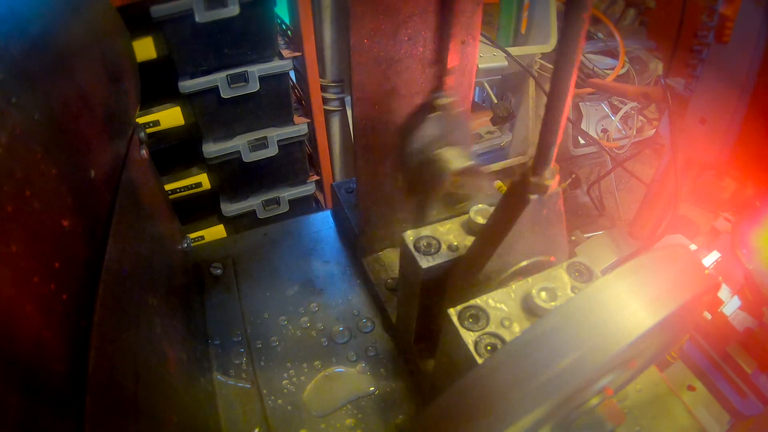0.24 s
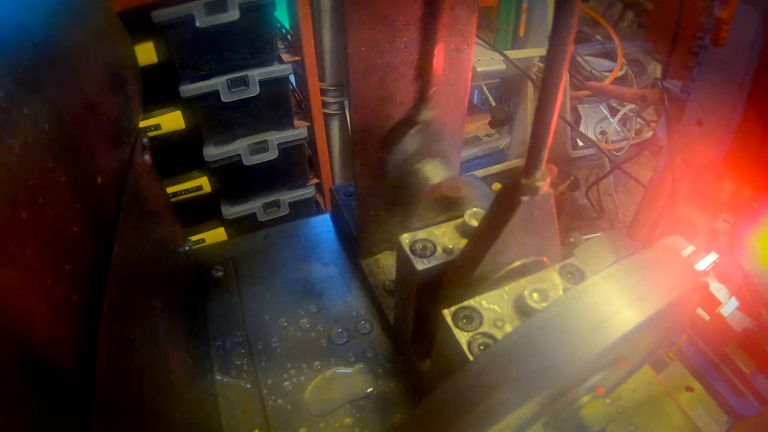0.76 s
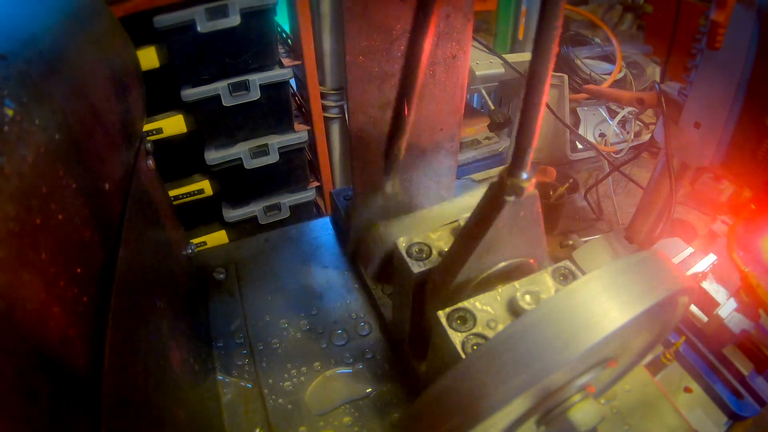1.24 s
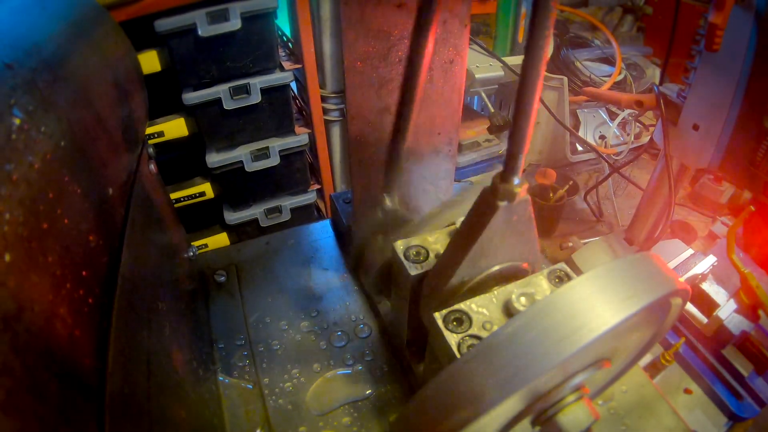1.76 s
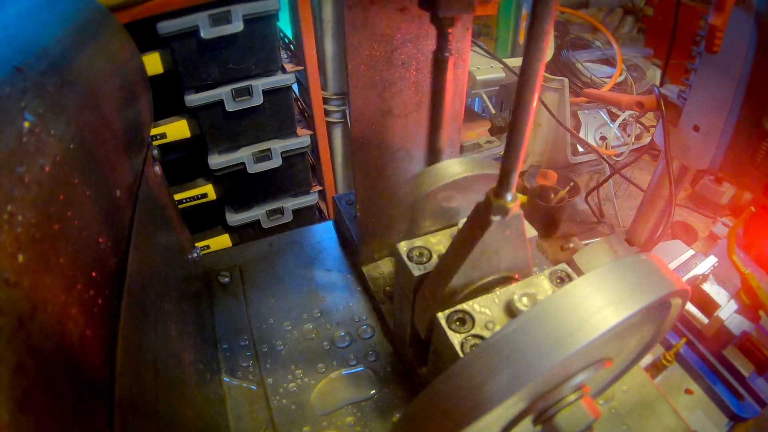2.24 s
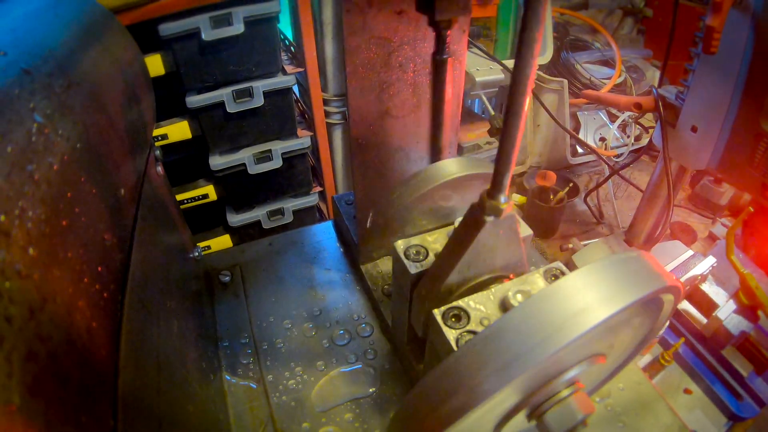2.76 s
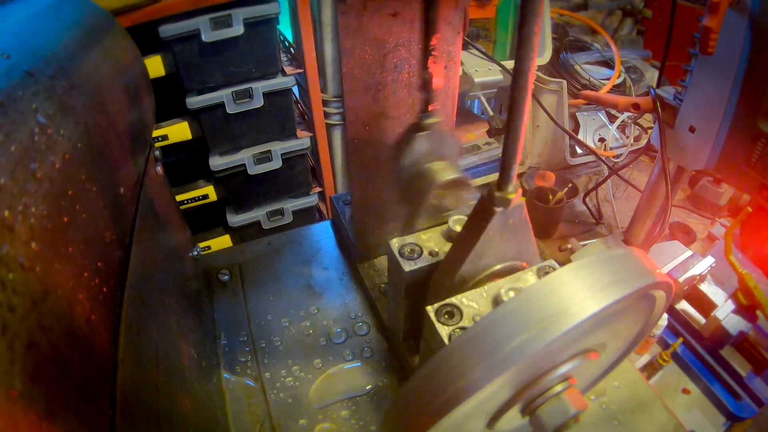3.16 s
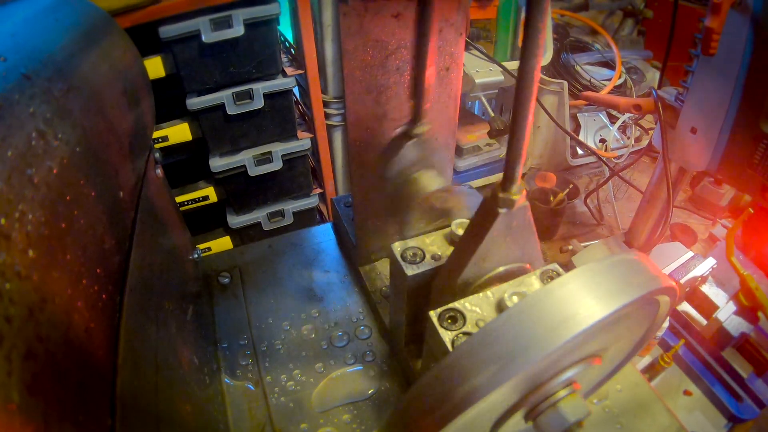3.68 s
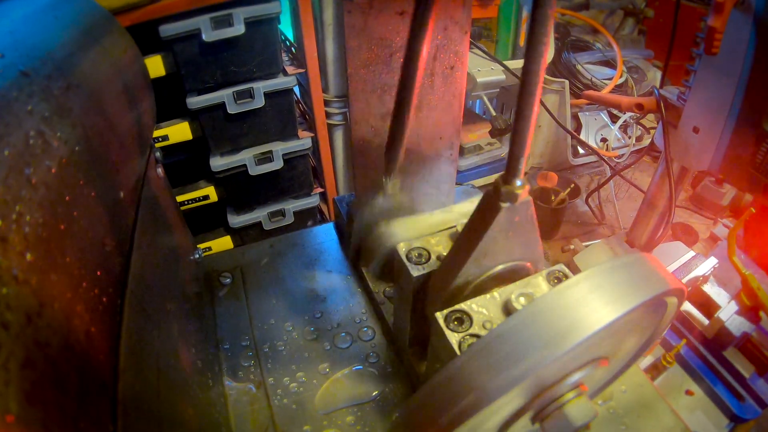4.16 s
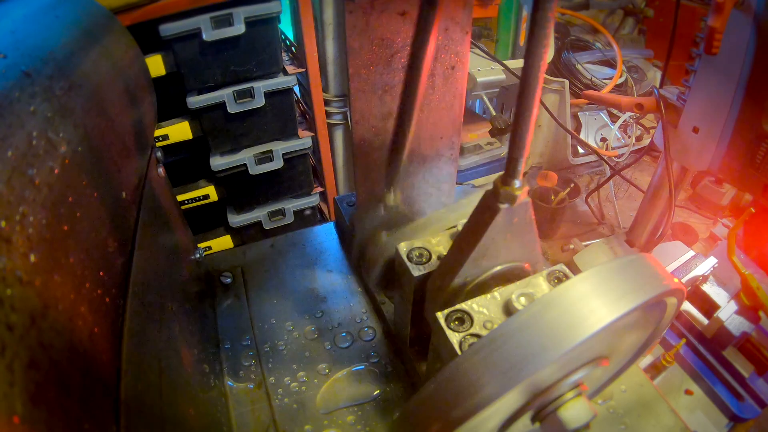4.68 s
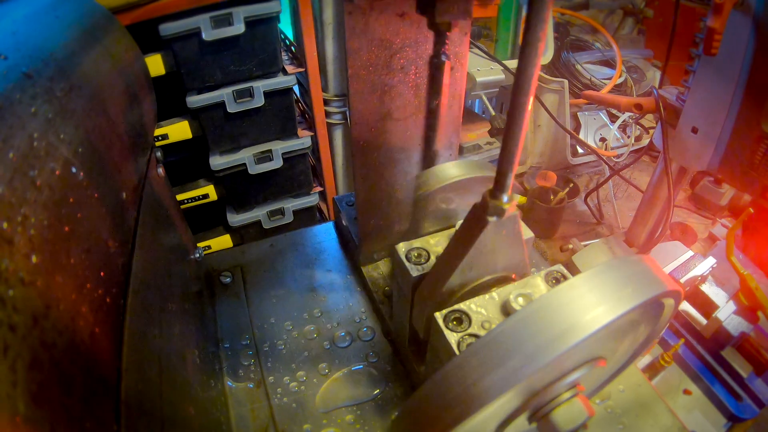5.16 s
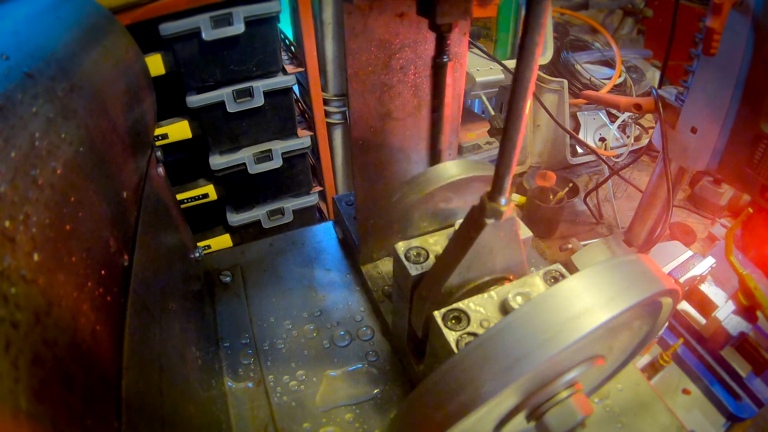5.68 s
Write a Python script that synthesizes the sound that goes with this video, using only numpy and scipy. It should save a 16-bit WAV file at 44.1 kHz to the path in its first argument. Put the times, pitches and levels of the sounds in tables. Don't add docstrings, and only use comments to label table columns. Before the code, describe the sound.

A small steam engine is already running at the start and keeps going for all six seconds, almost four turns a second, close to a stereo microphone in a dry workshop. Every turn brings a quick cluster of metallic ticks, short rattles and small rings, mostly slightly left, with hard, dry knocks at both ends of the stroke. Their strength varies; sharper clacks stand out near 1.3, 4.25, 5.0 and 5.6 s. Bright steam hisses constantly, swelling in rapid chuffs twice a turn, with thin breathy whistles in the pipe. Underneath, a burner roars softly while firebox and flue sing low wavering notes, surging irregularly; the higher one jumps up weakly around 3.1 s and wavers again near 5 s. A quiet, steady pump hum runs from about 2.1 to 5.0 s. Low draughts brush the microphone, and one soft thump of air pushes the right side at 4.9 s.

```python
import sys
import numpy as np
from scipy import signal
from scipy.io import wavfile
from scipy.ndimage import uniform_filter1d

SR = 44100
rng = np.random.default_rng(int(sys.argv[2]) if len(sys.argv) > 2 else 0)


def decibels_to_gain(level_db):
    exponent = np.asarray(level_db, float) / 20
    return 10 ** exponent


def store_pcm(level_fs):
    pcm = np.round(np.clip(level_fs, -1, 1) * 32767).astype(np.int16)
    wavfile.write(sys.argv[1], SR, np.atleast_2d(pcm).T)


N = 261072


def add(mix, s, sound):
    if s >= 0:
        part = mix[:, round(s * SR):][:, :sound.shape[1]]
        part += sound[:, :part.shape[1]]


def panned(x, lr_db):
    return x * decibels_to_gain([[lr_db / 2], [-lr_db / 2]])


def tone(hz, strength):
    return np.sqrt(2) * strength * np.sin(2 * np.pi * np.cumsum(hz) / SR)


def columns(table, hz):
    f, *rest = np.transpose(table)
    return [np.interp(np.log(hz + 1), np.log(f + 1), c)[:, None] for c in rest]


def white_pair(size):
    noise = rng.standard_normal((2, N + size)) * np.sqrt(SR / 2)
    return signal.stft(noise, SR, nperseg=size, noverlap=size * 3 // 4)


def ports(z, left, right, same, lead, size):
    same = np.clip(same, -1, 1)
    shared = same * z[0] * np.exp(-1j * lead)
    own = np.sqrt(1 - same ** 2) * z[1]
    pair = np.array([left * z[0], right * (shared + own)])
    return signal.istft(pair, SR, nperseg=size, noverlap=size * 3 // 4)[1][:, :N]


def resonances(table, hz, sign):
    return sum(decibels_to_gain(2 * db + sign * lr_db) / (1 + (2 * (hz[:, None] - f) / width) ** 2) ** 2
               for f, width, db, lr_db in table)


def wander(t, top_per_s):
    rates = np.geomspace(.15, 1, 24) * top_per_s
    x = sum(np.sin(2 * np.pi * (f * t + p)) for f, p in zip(rates, rng.random(24)))
    return x / np.sqrt(12)


def ring(hz, t60, rise):
    t = np.arange(round(t60 * SR)) / SR
    return decibels_to_gain(-60 * t / t60) * np.minimum(t / rise, 1) * np.sin(2 * np.pi * hz * t)


def burst(hz, length):
    u = np.arange(round(length * SR)) / (length * SR)
    return 9.5 * u * (1 - u) ** 2 * np.exp(-u) * np.sin(2 * np.pi * hz * length * u)


CRANK_PASSES = np.interp(np.arange(24), *np.transpose([(0, -.0027), (1, .2639), (5, 1.3259), (7, 1.8555),
                (10, 2.6475), (14, 3.7102), (23, 6.0952)]))


def crank_turns(t):
    return np.interp(t, CRANK_PASSES, np.arange(len(CRANK_PASSES)))


def bench(x):
    taps = np.zeros((2, 4000))
    at = np.arange(60, 3980, 20) + rng.integers(0, 20, (2, 196))
    fade = decibels_to_gain(-60 * at / SR / .08)
    np.put_along_axis(taps, at, rng.choice([-1., 1.], at.shape) * fade, 1)
    return signal.fftconvolve(x, taps / np.linalg.norm(taps[0]), axes=1)[:, :N]


def puff():
    at_s, hz, db = 4.873, 55, -28
    u = (np.arange(N) / SR - at_s) * hz * np.pi
    return np.array([[0], [1]]) * decibels_to_gain(db) * (1 - 2 * u ** 2) * np.exp(-u ** 2)


def pump():
    on_s, off_s, hz, db = 2.08, 5.01, 100.0, -37
    t = np.arange(N) / SR
    gate = np.clip(np.minimum(t - on_s, off_s - t) / .03, 0, 1)
    return panned(np.sqrt(2) * decibels_to_gain(db) * gate * np.sin(2 * np.pi * hz * t), .1)


# (frequency [Hz], level [dB per Hz], left-right likeness [0-1])
BURNER_ROAR = [(20, -75, 0.59), (32, -60, 0.68), (64.6, -70.5, 0.58), (97, -65, 0.76), (151, -55.5, 0.99),
               (169, -57.5, 0.88), (217, -65.5, 0.93), (242.7, -59, 1), (297, -73.5, 0.85), (476, -75.5, 1),
               (620, -66.5, 0.72), (650, -74.5, 1), (1124, -75.5, 0.21), (1790, -110, 1)]
# (frequency [Hz], width [Hz], level [dB per Hz], left over right [dB])
HOLLOW_TONES = [(122, 19, -52, 1.5), (231, 28, -64.5, 5), (351, 43, -70, -1.5), (533.4, 60, -61, 2.5),
                (770, 97, -70, 0.5), (838, 29, -71.5, 0), (1017, 41, -70.5, 11)]
# (time [s], level [dB])
DRAUGHT_LEVELS = [(0.0, -48), (1.57, -55), (2.09, -48), (2.13, -59), (2.34, -49), (3.94, -55), (4.15, -42),
                  (4.39, -57), (4.75, -46), (4.83, -60), (4.88, -39), (4.93, -58), (5.01, -44), (5.64, -52),
                  (5.89, -45), (5.92, -58)]


def burner():
    hz, t, z = white_pair(size=4096)
    level_db, same = columns(BURNER_ROAR, hz)
    s, draught_db = np.transpose(DRAUGHT_LEVELS)
    breath_per_s = 3.0
    breaths = [(0, 58, np.interp(t, s, draught_db) - draught_db.mean()),
               (470, 650, 1.6 * wander(t, breath_per_s)),
               (138, 300, 0.97 * wander(t, breath_per_s))]
    swell_db = sum(((hz > low) & (hz < high))[:, None] * db for low, high, db in breaths)
    powers = [decibels_to_gain(2 * level_db) + resonances(HOLLOW_TONES, hz, sign) for sign in (1, -1)]
    left, right = np.sqrt(powers) * decibels_to_gain(swell_db)
    return ports(z, left, right, same, 0, size=4096)


# (time [s], peak level [dB], half length [s])
FLAME_SURGES = [(0.054, -33, 0.1), (0.35, -32.5, .06), (0.507, -33, 0.088), (0.664, -29, 0.043),
                (0.796, -34, 0.017), (0.951, -29.5, 0.11), (1.246, -38, 0.046), (1.398, -33.5, 0.075),
                (1.658, -37, 0.11), (1.854, -32, 0.043), (1.99, -37.5, 0.067), (2.2, -39, 0.046),
                (2.407, -32, 0.054), (2.69, -39, 0.042), (2.903, -34.5, 0.061), (3.255, -38, 0.078),
                (3.393, -32, 0.047), (3.564, -41, 0.031), (3.749, -28, 0.075), (4.097, -30, 0.11),
                (4.245, -29, .04), (4.434, -31.5, 0.063), (4.718, -28.5, 0.098), (5.023, -36, .04),
                (5.14, -32.5, .05), (5.28, -36, 0.027), (5.46, -34, 0.047), (5.65, -34.5, 0.038),
                (5.797, -31.5, .05), (5.9, -33, 0.03)]


def firebox():
    note_hz, wander_hz, rest_db = 120.5, 2.78, -43
    t, slow = np.arange(N) / SR, np.arange(0, N + 256, 256) / SR
    swell = decibels_to_gain(rest_db)
    for s, db, half in FLAME_SURGES:
        swell = swell + decibels_to_gain(db) * np.exp(-((slow - s) / half) ** 2)
    hz = note_hz + wander_hz * wander(slow, 4.5)
    return panned(tone(np.interp(t, slow, hz), np.interp(t, slow, swell)), 0.22)


# (time [s], pitch [Hz], level [dB])
FLUE_PITCHES = [
    (0.0, 221.4, -39),
    (0.1, 229, -40.5),
    (1.35, 221.5, -40.5),
    (3.03, 221.1, -43),
    (3.08, 228.9, -46.5),
    (4.66, 220.5, -41),
    (4.95, 231.0, -40.5),
    (5.13, 219.5, -43),
    (5.92, 224.5, -39),
]


def flue():
    flutter_per_s, depth_db, wander_hz = 7.0, 3.3, 1.4
    s, hz, level_db = np.transpose(FLUE_PITCHES)
    t, slow = np.arange(N) / SR, np.arange(0, N + 256, 256) / SR
    flutter = np.interp(t, slow, wander(slow, flutter_per_s))
    drift = np.interp(t, slow, wander(slow, flutter_per_s))
    swell = decibels_to_gain(np.interp(t, s, level_db) + depth_db * flutter - 5.0)
    swell = uniform_filter1d(swell, 900)
    return panned(tone(np.interp(t, s, hz) + wander_hz * drift, swell), 0.18)


# (frequency [Hz], width [Hz], level [dB per Hz], left over right [dB])
PIPE_WHISTLES = [
    (2840, 140, -67.5, -2),
    (3700, 125, -71.5, 7),
    (4500, 230, -73.5, -7),
    (6240, 55, -88, -.6),
]


def pipe(shut_db=-8):
    hz, _, z = white_pair(size=2048)
    angle = crank_turns(np.arange(N) / SR) % 1
    shut = np.exp(-((angle - .3) / .09) ** 2) + .6 * np.exp(-((angle - .8) / .06) ** 2)
    left, right = np.sqrt([resonances(PIPE_WHISTLES, hz, sign) for sign in (1, -1)])
    return decibels_to_gain(shut_db * shut) * ports(z, left, right, 0.89, 0, size=2048)


# (frequency [Hz], left [dB per Hz], right [dB per Hz], likeness [0-1], left leads by [rad])
STEAM_HISS = [(940, -99, -80, 0.51, .3), (1410, -69.5, -73, 0.73, 0.11), (1760, -73, -75.5, 0.5, 0.28),
              (2160, -70.5, -72, 0.79, .1), (2600, -68, -72.5, 0.88, .1), (3880, -69.5, -71, 0.99, 0.11),
              (4030, -73, -76, 1, .1), (5270, -72, -72.5, 0.77, 0.62), (5860, -70, -71.5, 0.61, 0.33),
              (6050, -73, -70.5, .3, .8), (6230, -73.5, -69.5, 0.84, 0.75), (7080, -69, -71.5, 1, 2.02),
              (7730, -70.5, -70, 0.47, 1.32)]
# (frequency [Hz], left [dB per Hz], right [dB per Hz], likeness [0-1], left leads by [rad])
STEAM_FIZZ = [(8370, -69.5, -79, .6, 0.7), (9080, -75.5, -71, 0.72, 2.84), (9940, -68, -97, 0.81, 1.7),
              (10310, -72, -105, .5, 2.1), (10900, -84, -87, .25, 1.6), (12000, -83.5, -100, .15, 1.6),
              (13700, -82.5, -99, .1, 1.9), (15100, -101, -116, .1, 1.9)]
# (crank angle [turns], half length [turns], frequency [Hz], half width [Hz], left [dB], right [dB])
STEAM_SWELLS = [(0.32, 0.1, 9430, 3100, 5, 5), (0.886, 0.053, 9100, 2300, 2, 3),
                (0.37, 0.075, 17400, 1200, 5, 6), (0.817, 0.045, 10000, 3400, 5.5, 6),
                (0.27, 0.19, 15000, 700, 14, -10), (.85, 0.12, 15000, 700, 17, -3),
                (0.16, 0.25, 2530, 240, 3, -2.5), (0.383, 0.02, 3300, 2900, 2.5, 0),
                (0.044, 0.17, 6700, 4100, 2, 2), (0.056, 0.093, 11640, 2300, 4.5, -11),
                (0.51, 0.12, 11700, 1600, 3.5, -8), (0.31, 0.032, 4400, 5700, -3.5, -2.1),
                (0.74, 0.084, 3600, 2800, -0.9, -2.1), (0.51, 0.16, 6100, 600, -3.1, -3.2)]


def steam(patchy_db=1.34, flicker_db=1.1):
    hz, t, z = white_pair(size=256)
    left_db, right_db, same, lead = columns(STEAM_HISS + STEAM_FIZZ, hz)
    crank = crank_turns(t)
    patches = uniform_filter1d(rng.standard_normal(z[0].shape), 5, 0)
    patches = uniform_filter1d(patches, 24, 1)
    flicker = uniform_filter1d(rng.standard_normal(len(t)), 4)
    chance_db = patchy_db * patches / patches.std() + flicker_db * flicker / flicker.std() - 2.0
    strength = 1 + .2 * rng.standard_normal((len(STEAM_SWELLS), len(CRANK_PASSES) + 1))
    for (angle, span, f, width, gain_left_db, gain_right_db), each in zip(STEAM_SWELLS, strength):
        nearest = np.round(crank - angle)
        stroke = each[nearest.astype(int) + 1] * np.exp(-((crank - angle - nearest) / span) ** 2)
        swell = stroke * np.exp(-((hz[:, None] - f) / width) ** 2)
        left_db = left_db + gain_left_db * swell
        right_db = right_db + gain_right_db * swell
    cut = hz[:, None] > 700
    return ports(z, cut * decibels_to_gain(left_db + chance_db), cut * decibels_to_gain(right_db + chance_db), same, lead, size=256)


# (crank angle [turns], rattle length [s], level [dB], left over right [dB])
ROD_CONTACTS = [(0.024, .006, -43.5, 11), (0.389, .001, -51, 0), (.455, .008, -41, 9),
                (.512, .0009, -40, 9), (.533, .0035, -37, 7), (.568, .009, -34.5, 7.5), (.63, .002, -42, 1),
                (0.895, 0.00201, -42.5, 13), (.98, .014, -45, 7), (0.924, 0.0062, -48.5, 10)]
PIN_CONTACTS = [
    (.03, 0.0062, -48, -1),
    (.092, 0.0022, -36.5, .9),
    (0.111, .0024, -44, -1),
    (.633, .0017, -50, 9),
    (.652, .017, -41, 15),
    (.928, 0.0065, -44, .4),
]
VALVE_CONTACTS = [
    (.668, .013, -34.5, -7),
    (.755, .004, -34.5, 4),
    (.892, .0042, -38.5, 4),
]
STRAP_CONTACTS = [
    (.03, .003, -58, 1.2),
    (.672, .0053, -35.5, 6.3),
]
BED_CONTACTS = [
    (.66, .012, -52, -27),
    (.705, .017, -43, 13),
    (.9, .025, -41, 1),
]
COLUMN_CONTACTS = [
    (.657, .006, -45.5, 1.3),
    (.925, 0.00724, -42, 3),
]
# (crank angle [turns], ring [Hz], time to fall 60 dB [s], level [dB], left over right [dB])
LONE_CONTACTS = [
    (.386, 1250, 0.0041, -39, -.4),
    (0.42, 1660, 0.003, -49, -5),
    (.667, 2060, 0.0348, -36, 5.5),
    (.665, 2880, 0.028, -37, 10),
    (.925, 2100, 0.098, -38, 1),
]


def linkage():
    scatter_db, slack_turns, detune = 1.3, .002, .015
    parts = [(3050, 0.0031, ROD_CONTACTS), (5690, 0.0083, PIN_CONTACTS),
             (6290, 0.014, VALVE_CONTACTS), (3540, 0.0035, STRAP_CONTACTS),
             (980, 0.14, BED_CONTACTS), (1451, 0.074, COLUMN_CONTACTS)]
    contacts = [(angle, length, hz, t60, db, lr_db)
                for hz, t60, taps in parts for angle, length, db, lr_db in taps]
    contacts += [(angle, .0017 + .12 * t60, hz, t60, db, lr_db)
                 for angle, hz, t60, db, lr_db in LONE_CONTACTS]
    out = np.zeros((2, N))
    for angle, length, hz, t60, db, lr_db in contacts:
        chances = rng.standard_normal((len(CRANK_PASSES), 3))
        for start, end, (size, late, tune) in zip(CRANK_PASSES, CRANK_PASSES[1:], chances):
            force = rng.choice([-1, 1], 24) * rng.exponential(1, 24)
            place = rng.random(24)
            rattle = np.zeros(1200)
            np.add.at(rattle, np.clip(place * length * SR, 0, 1199).astype(int), force)
            sound = np.convolve(rattle, ring(hz * (1 + detune * tune), t60, 0.00031))
            sound /= np.sqrt(np.sum(sound ** 2) / (.006 * SR))
            sound *= decibels_to_gain(db + scatter_db * size)
            add(out, start + (angle + slack_turns * late) * (end - start), panned(sound, lr_db))
    return out


# (time [s], peak level [dB])
DULL_KNOCKS = [(0.1216, -25), (0.127, -20.5), (0.3992, -18.5), (0.653, -22), (0.9312, -15.5), (1.196, -20),
               (1.2122, -21), (1.4611, -20), (1.7274, -18), (3.034, -28), (3.048, -17), (3.314, -17.5),
               (3.5774, -28), (3.8132, -22), (3.8455, -17), (4.111, -17.5), (4.376, -22), (4.9055, -25),
               (5.1707, -17.5), (5.1757, -19.5), (5.441, -20), (5.7009, -23)]
# (time [s], peak level [dB], lower ring [Hz])
BRIGHT_KNOCKS = [(0.2657, -20, 2550), (0.2876, -21, 3140), (0.531, -18, 2490), (0.5384, -21.5, 3090),
                 (1.0685, -25, 2846), (1.311, -26, 3040), (1.3337, -11.5, 2980), (1.8352, -20.5, 3474),
                 (2.1051, -32, 2317), (2.364, -17.5, 3310), (2.386, -19.5, 2680), (2.915, -21, 2390),
                 (2.9204, -28, 2716), (3.4154, -20, 3240), (4.2252, -23, 2900), (4.2481, -15.5, 3195),
                 (4.5057, -20.5, 2700), (4.7726, -19, 2340), (5.0424, -13.5, 2960), (5.2806, -27, 2650),
                 (5.285, -23, 3370), (5.537, -23, 3280), (5.5454, -20, 3080), (5.5733, -11.5, 2940),
                 (5.811, -25, 2810)]


def knocks():
    bottom_hz, bottom_spread, bottom_s, top_s = 3080, 0.018, .0017, .0021
    upper_hz, upper_s = 5750, .0032
    rows = []
    for s, db in DULL_KNOCKS:
        hz = bottom_hz * (1 + bottom_spread * rng.standard_normal())
        rows.append((s + .0002, db, -21, hz, bottom_s))
    for s, db, hz in BRIGHT_KNOCKS:
        upper_db = -3.5 + (db + 14.5)
        rows.append((s, db, upper_db, hz, top_s))
    out = np.zeros((2, N))
    for s, db, upper_db, hz, length in rows:
        add(out, s + .0006, panned(decibels_to_gain(db - .6) * burst(hz, length), 3.6))
        add(out, s + .0005, panned(decibels_to_gain(db + upper_db - 4) * burst(upper_hz, upper_s), 1.1))
    return out


def scene():
    boiler = burner() + firebox() + flue() + pipe()
    metal = linkage() + knocks()
    echo_db = -15
    return puff() + pump() + boiler + steam() + metal + decibels_to_gain(echo_db) * bench(metal)


def low_pass(x):
    return signal.sosfilt(signal.butter(12, 15660, fs=SR, output="sos"), x)


def record(dry):
    return low_pass(dry)


dry = scene()
out = record(dry)
store_pcm(out)
```